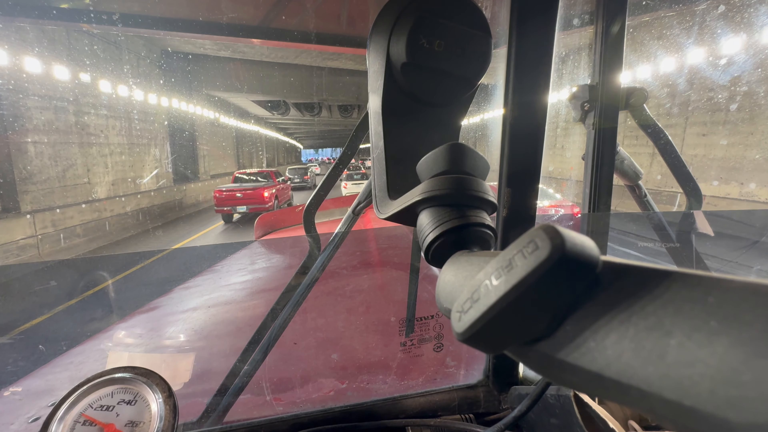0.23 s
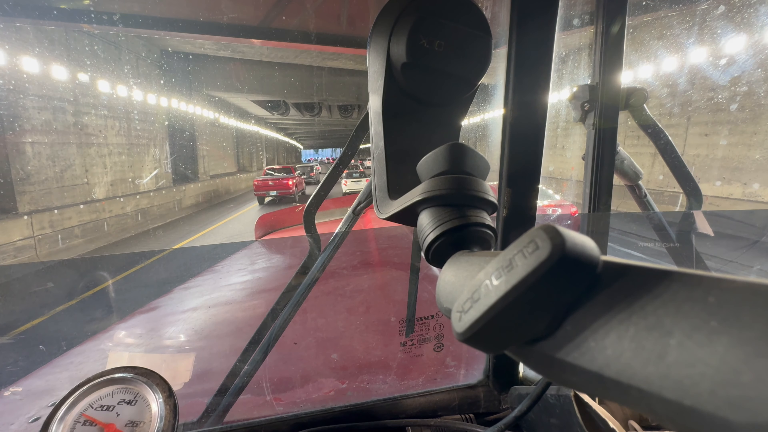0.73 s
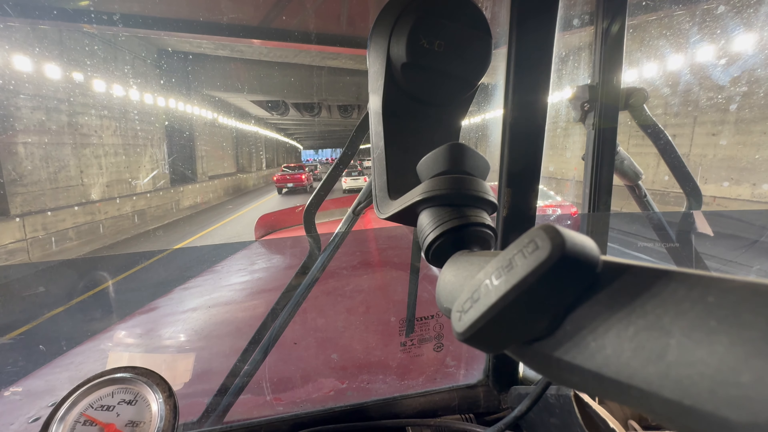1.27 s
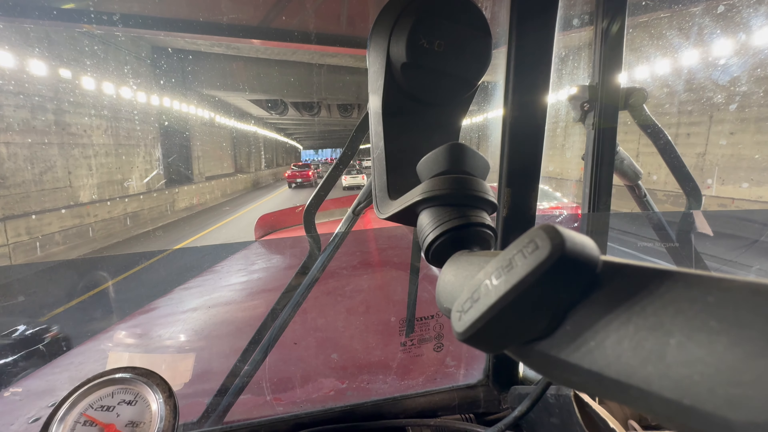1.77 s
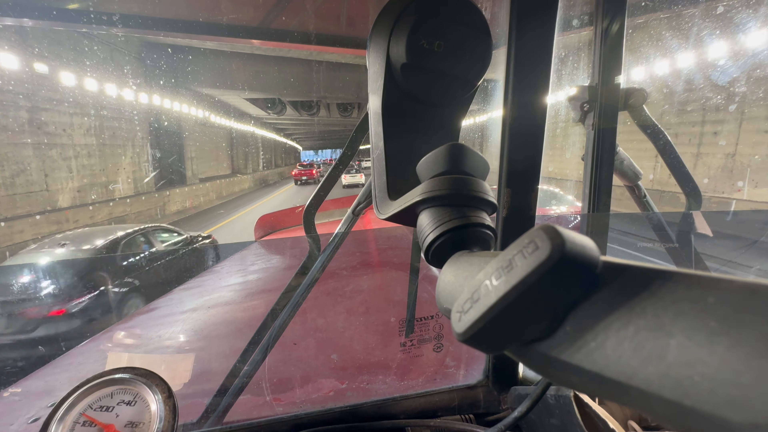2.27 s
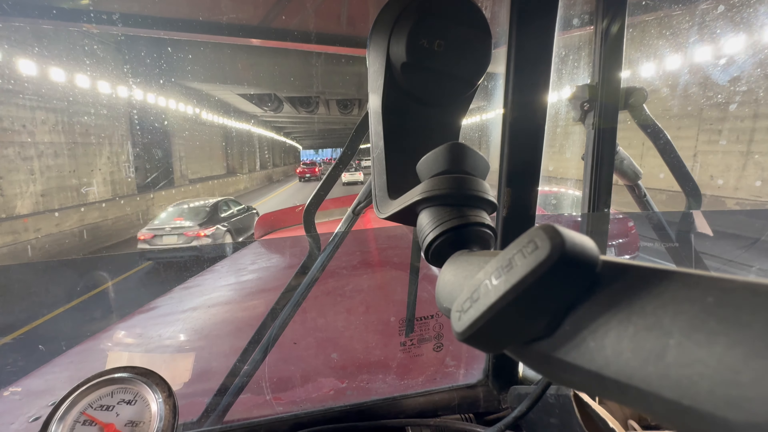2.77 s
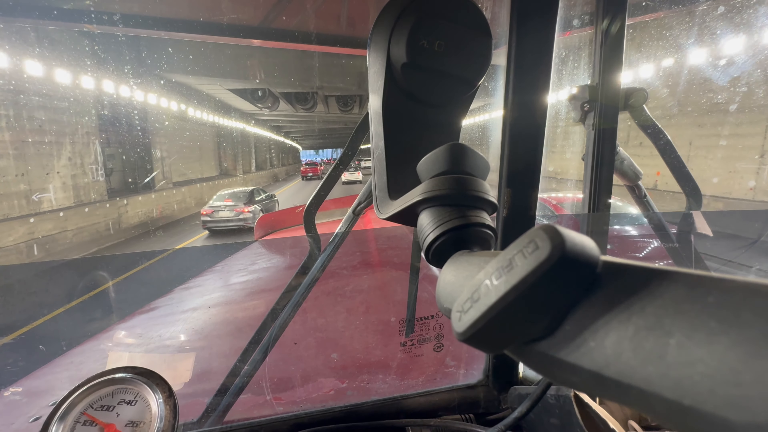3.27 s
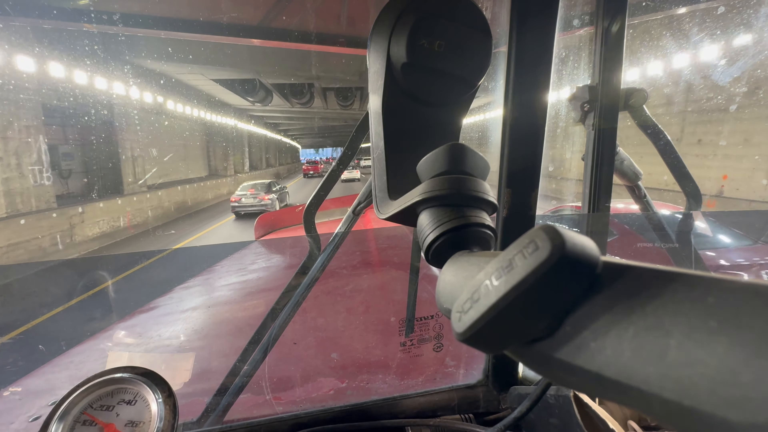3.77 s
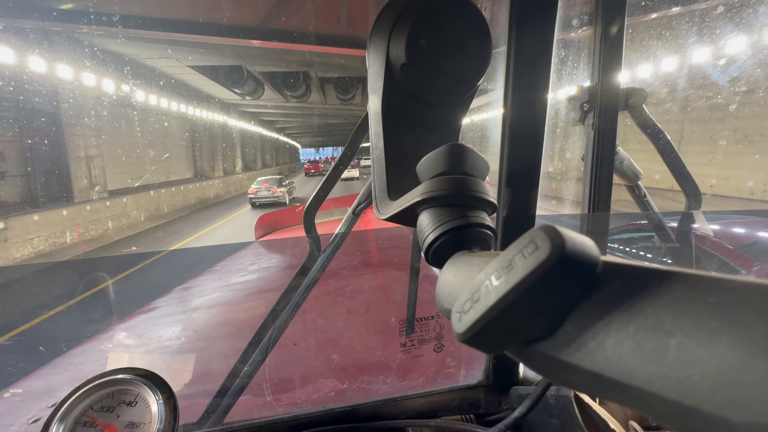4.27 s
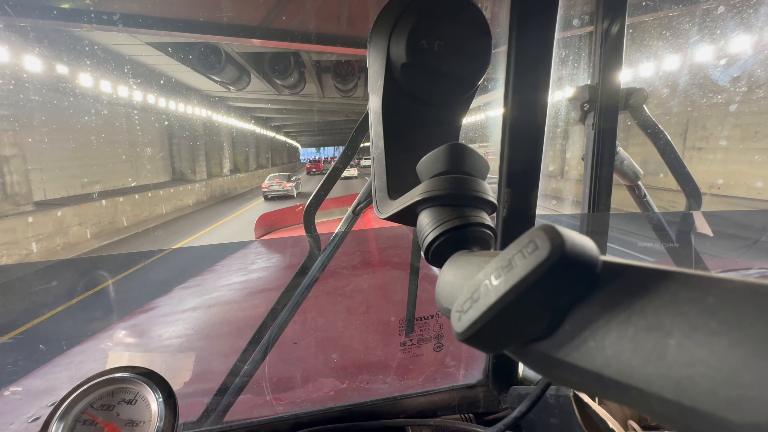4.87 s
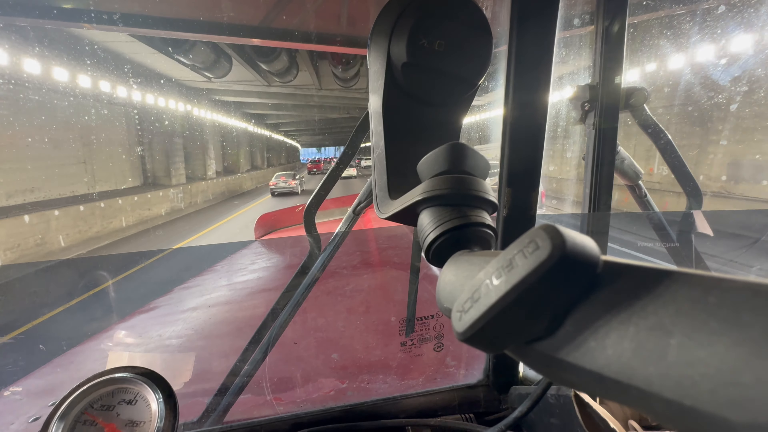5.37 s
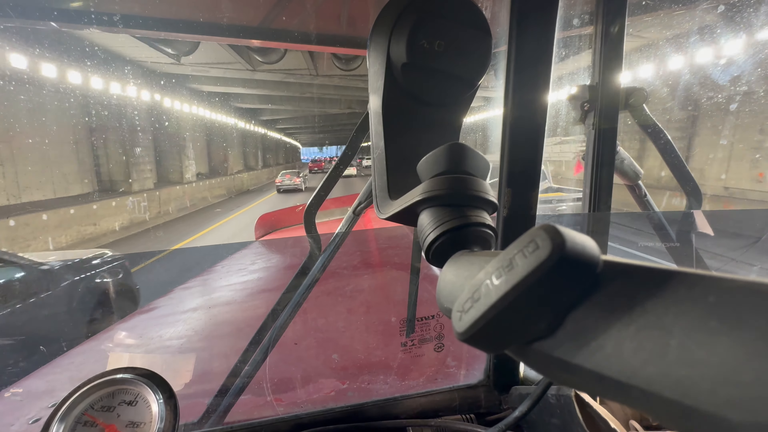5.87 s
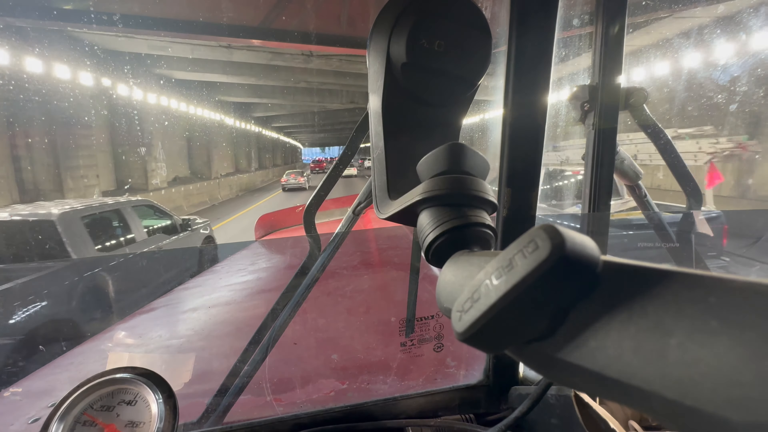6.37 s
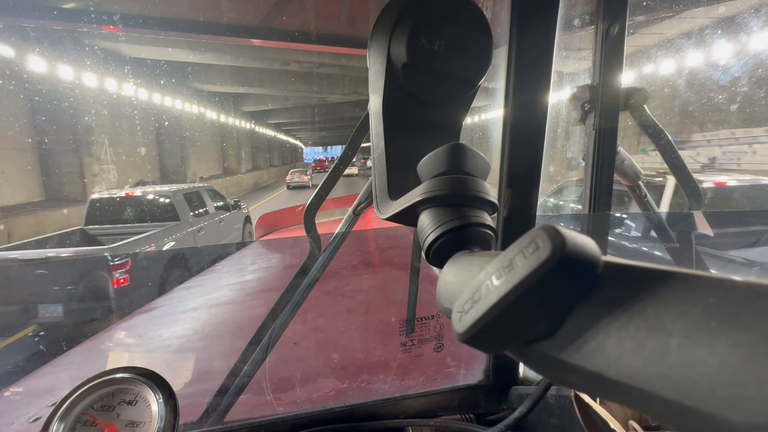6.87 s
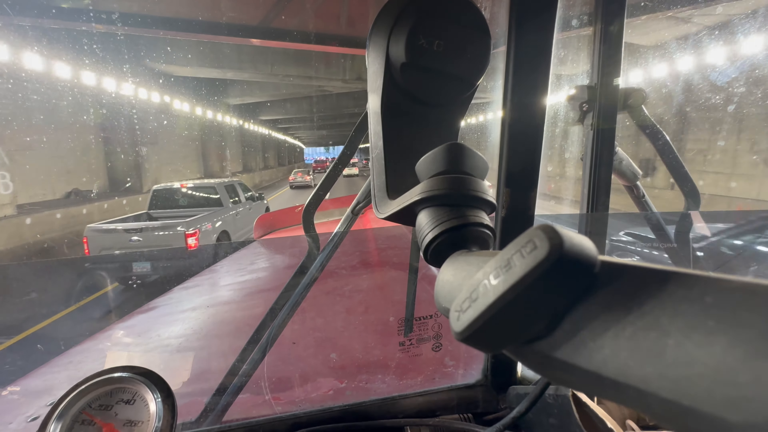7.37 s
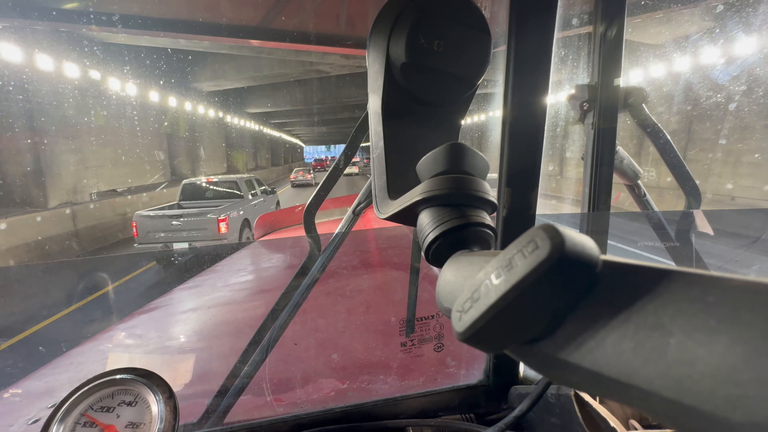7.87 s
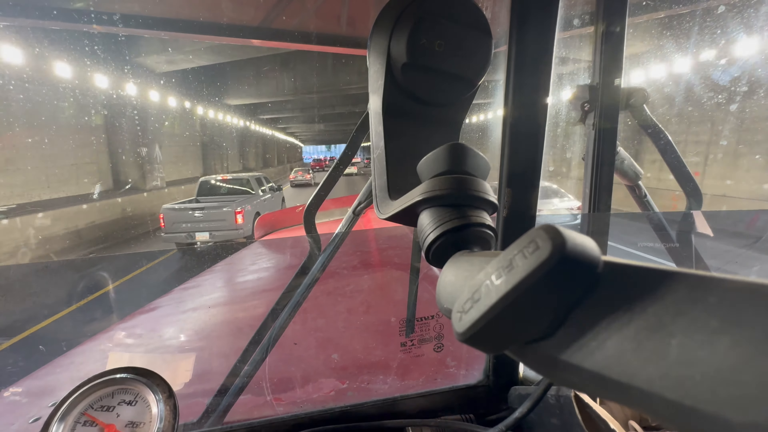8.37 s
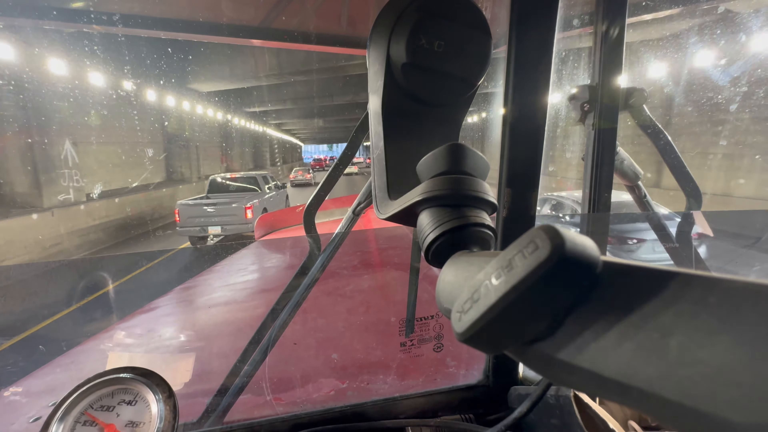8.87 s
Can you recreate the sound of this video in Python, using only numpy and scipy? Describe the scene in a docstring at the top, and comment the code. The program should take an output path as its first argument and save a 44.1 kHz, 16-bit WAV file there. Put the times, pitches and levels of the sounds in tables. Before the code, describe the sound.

A heavy diesel truck accelerates through a tunnel, heard in stereo by the driver. Throaty uneven exhaust pulses and a booming hum fill the cab, with block clatter and a thin turbo whistle on top. The pitch climbs in three long pulls, sagging between them as gears clunk and air valves puff, the strongest a sharp pssh near the end. Low road rumble runs throughout.

```python
"""A six-cylinder diesel truck pulls away in a tunnel and changes up through the gears, heard in stereo
from inside the cab. Uneven exhaust pulses ring cab modes, and sines carry the firing rate and multiples.
Noise pulsing with the firings makes the block clatter; a narrow noise band is the turbo whistle.
At shifts the load drops, air valves puff in noise bursts and the lever ticks in struck modes.
A seal squeaks in short glides; intake hiss and road rumble are banded noise."""
import sys
import numpy as np
from scipy import signal
from scipy.io import wavfile

SR = 44100
rng = np.random.default_rng(int(sys.argv[2]) if len(sys.argv) > 2 else 0)


def inscribe(sig):
    """Save sig as 16-bit PCM at rate SR to the path in sys.argv[1].

    A 1-D sig is mono; a 2-D sig holds one channel per row.
    Samples are clipped to [-1, 1] before scaling.
    """
    pcm = np.round(np.clip(np.atleast_2d(sig).T, -1, 1) * 32767)
    wavfile.write(sys.argv[1], SR, pcm.astype(np.int16))


N = 401751

# Every *_LAW is one row: base level in dB, share of the load, share of the boost,
# dB per octave of engine speed above 60 firings per s, dB per octave of turbo pitch above 5 kHz.

# Exhaust pulses in the cab.
EXHAUST_LAW = (-39.5, 1, 0, 1, 2)
# Lift of the cab modes below 150 Hz.
LOW_MODES_LAW = (4, 0.5647, -0.34, -3, -0.56)
# Relative strength of each cylinder's firing, at low engine speed.
SLOW_CYLINDERS = [1.5, .68, .55, 1.0, .45, .52]
# The same at high engine speed, where one firing leads.
FAST_CYLINDERS = [1.5, .72, .6, .8, .55, .6]
# The same heard crosswise in the cab: every third firing leads.
CROSSWISE_CYLINDERS = [1.5, .5, .6, 1.25, .45, .55]
# Manifold runners differ: mean delay of each cylinder's pulse in ms.
RUNNER_DELAYS = [0, .55, -.4, .3, -.6, .15]
# Lift of groups of cab modes. Each row: time in seconds, bark near 450 Hz alike on both sides in dB,
# bark crosswise in dB, modes from 150 to 370 Hz in dB, modes above 560 Hz in dB, modes below 150 Hz in dB.
MODE_LIFTS = [(0, -14, -9, 14.5, -12, 5), (.4, -20, -9, 5.5, -4, 3.5), (.58, -9, -6, 0.5, 3.5, -2),
              (.9, -19.5, -10, -1, 1, 0), (1.3, 1, -2.5, 1.5, -1.5, -2), (1.7, -1, -5, 4, 3, 2),
              (2.2, -1.5, -3.5, 4.5, 5, -0.5), (2.8, -4, -5, 1.5, 4, -5.5), (3.1, 5, 0.5, 4, 1, -2.5),
              (3.5, -2, -1.5, 5, 3.5, -3), (3.9, 4.5, -1.5, 6, 1, 2.5), (4.25, -9, -3, -0.5, 6, 3),
              (4.6, -9, -2.5, 5.5, -1, 3.5), (5.0, 4.5, -4, 6.5, -1, 1), (5.4, 2.5, 1, 2, 5, -2.5),
              (5.7, -1, -7, 3, -6, -2.5), (6.0, -24, -7, -1.5, 5, -3), (6.35, -6, -2, 4, -1, 3),
              (6.65, 4, 1.5, 7.5, 7, 6), (7.1, -0.5, -0.5, 0, -0.5, -9), (7.4, 0, -5, 1.5, -8, -9.5),
              (7.7, -5, -13, 0.5, -7, -6), (8.0, -31, -6, 3.5, 7, -2), (8.35, -4, 0, -1, -0.5, 5),
              (8.7, 5.5, 0, 2, 1.5, -1), (9.11, -3, 1.5, 4.5, -2, -1)]
# Once per engine cycle the bark swells. Each row: time in seconds, mean depth in dB.
THROB = [(0, .5), (2.7, .5), (3.1, 3), (3.9, 1), (4.7, 1), (5.0, 4.5), (5.5, 3), (5.8, 0), (6.4, 1),
         (6.7, 3.5), (7.05, 0), (8.4, 0), (8.7, 3), (9.11, 2)]


def exhaust(per_s, count, state):
    """One pulse per firing, uneven from cylinder to cylinder, plus some turbulence, rings the cab."""
    level_db, low_db = follow(EXHAUST_LAW, state), follow(LOW_MODES_LAW, state)
    *barks_db, middle_db, upper_db, lowest_db = in_time(MODE_LIFTS)
    at = np.flatnonzero(np.diff(np.floor(count)))[:-1]
    cylinder = count[at].astype(int) % 6
    chance = rng.standard_normal((len(at), 2))
    late_ms = np.array(RUNNER_DELAYS)[cylinder] + .08 * chance[:, 0]
    heard = at + np.round(late_ms * SR / 1000).astype(int)

    whole, across, steady = np.full((3, N), 1e-18)
    fast = np.clip((per_s[at] - 52) / 8, 0, 1)   # crossfade from 52 to 60 firings per s
    strength = (1 - fast) * np.array(SLOW_CYLINDERS)[cylinder] + fast * np.array(FAST_CYLINDERS)[cylinder]
    whole[heard] = strength + .16 * chance[:, 1]
    across[heard] = np.array(CROSSWISE_CYLINDERS)[cylinder] + .09 * chance[:, 1]
    steady[at] = np.mean(SLOW_CYLINDERS)
    # the even part below 340 Hz is taken out: it sounds as the firing tones
    lows = signal.sosfiltfilt(signal.butter(3, 340, fs=SR, output="sos"), steady)
    turbulence = from_db(-18) * np.sqrt(per_s / SR) * rng.standard_normal((2, N))

    throb_depth_db = in_time(THROB)[0] * np.clip(1 + .6 * drift(5), 0, 2)
    throb_db = throb_depth_db * np.cos(2 * np.pi * (count - 1.45) / 6)
    scale = np.sqrt(SR / per_s)   # same power at any speed
    alike = scale * (whole - lows + turbulence[0])
    opposed = scale * (across + turbulence[1])
    barks_db = np.array(barks_db) + 6.5 + throb_db
    return from_db(level_db + 28.0) * cab(alike, opposed, low_db + lowest_db, middle_db, barks_db, upper_db)


# Cab modes heard alike on both sides.
# Each row: frequency in Hz, nominal width in Hz, relative level in dB.
ALIKE_MODES = [(42.2, 21, 0), (84.4, 33.8, 2.5), (128.5, 13.5, 11), (181.6, 79, -24), (213.2, 23.6, 2.5),
               (289.5, 12.5, 1.5), (337, 30, -23), (420.6, 20, -19.5), (448.5, 26, -17.5), (479, 63, -24.5),
               (553, 27, -35), (596, 15, -17.5), (710.3, 43, -14.5), (869, 41, -29.5)]
# Crosswise cab modes, opposite on the two sides.
# Each row: frequency in Hz, nominal width in Hz, relative level in dB.
CROSSWISE_MODES = [(84.6, 16, 0), (164, 21.4, 5.5), (272, 48, -6), (339, 18, -4.5), (405, 33, -3.5),
                   (436, 70, -10.5), (536, 46, -32), (627, 110, -15.5), (670, 46, -19.5), (976, 62, -13),
                   (1070, 110, -21), (1150, 99, -22.5)]
SHARPEST_Q, MODE_FLICKER_DB = 24, 2.5   # modes above 250 Hz are damped by the trim and come and go
UPPER_LEAD_S = .008   # modes above 560 Hz speak ahead of the bark


def cab(alike, opposed, low_db, middle_db, barks_db, upper_db):
    """Cab modes ring in parallel; crosswise ones push the sides against each other."""
    sides = []
    for x, modes, bark_db in zip((alike, opposed), (ALIKE_MODES, CROSSWISE_MODES), barks_db):
        lift = from_db([low_db, middle_db, bark_db, upper_db])   # below 150 Hz, up to 370, up to 560, above
        groups = np.zeros((4, N))
        for hz, width, level_db in modes:
            # the lows of a pulse arrive first
            delay_s = .004 * np.log2(hz / 600) - UPPER_LEAD_S * (hz > 560)
            late = np.roll(x, round(SR * delay_s))
            if hz > 250:
                width = max(width, hz / SHARPEST_Q)
                level_db = level_db + MODE_FLICKER_DB * drift(4.0)
            # filtered twice: dark valleys between the modes, no click
            ringing = resonance(resonance(late, hz, width), hz, 4 * width)
            groups[np.searchsorted([150, 370, 560], hz)] += from_db(level_db) * ringing
        sides.append(np.sum(lift * groups, axis=0))
    return sides[0] + sides[1] * [[1], [-1]]


# Tone at the firing rate. Each row: time in seconds, level in dB.
FIRING_TONE = [(0, -26), (.4, -29.5), (.62, -25.5), (.8, -29.5), (1.0, -20.5), (1.55, -19.5), (2.2, -19),
               (2.62, -18.5), (2.85, -15), (3.2, -20), (3.81, -18.5), (4.14, -24.5), (4.45, -28.5),
               (4.75, -21), (5.7, -16), (5.77, -32), (5.9, -24), (5.98, -36.5), (6.2, -39), (6.3, -23.5),
               (6.44, -20.5), (7.2, -17.5), (7.7, -17), (7.78, -30), (7.97, -30), (8.1, -45), (8.26, -25.5),
               (8.42, -19), (8.7, -21), (9.11, -16.5)]
# Tone an octave above the firing rate, a level law.
OCTAVE_LAW = (-38.5, 1.97, -0.27, -1.1, 0.6)
# How the cab passes that octave. Each row: frequency in Hz, gain in dB.
OCTAVE_PASS = [(80, 6), (90, -5), (100, -4), (110, -7.5), (120, -5.5), (134, 9.5), (146, 1.5), (160, -3),
               (175, -13.5), (200, -4)]
WAVER_DB, WAVER_PER_S = 2, 1.4   # the octave swells and sinks
# Third, fourth and sixth multiples of the firing rate, a level law.
OVERTONES_LAW = (-48, 1.32, 0, 3.5, 1)
# How the cab passes these multiples. Each row: frequency in Hz, gain in dB.
OVERTONE_PASS = [(130, -8), (185, -6), (205, 2), (218, 5), (235, 2), (258, -9), (286, 4), (303, -8),
                 (325, -8), (350, -16), (400, -9), (425, -6), (455, -12), (520, -16)]


def firing_tones(per_s, count, state):
    """The firing rate and its low multiples stand clean, lifted where they cross a cab mode."""
    tone_db, = in_time(FIRING_TONE)
    cab_gain_db = at_hz(OCTAVE_PASS, 2 * per_s)
    octave_db = follow(OCTAVE_LAW, state) + cab_gain_db + WAVER_DB * drift(WAVER_PER_S)
    upper = 0
    for k in (3, 4, 6):
        gain_db = at_hz(OVERTONE_PASS, k * per_s) + 4 * drift(9.0)
        upper = upper + from_db(gain_db) * np.cos(2 * np.pi * k * count)
    tones = from_db(tone_db) * np.sin(2 * np.pi * count) - from_db(octave_db) * np.sin(4 * np.pi * count)
    return np.sqrt(2) * (tones + from_db(follow(OVERTONES_LAW, state)) * upper * panned(3.0))


# Combustion noise, a level law.
KNOCK_LAW = (-47, 0.0981, 0.6919, -1.5, 3.5)
# Spectrum of the combustion noise. Each row: frequency in Hz, relative density in dB per Hz.
CLATTER_SPECTRUM = [(590, -50), (1000, 3.5), (1110, 15.5), (1470, -2), (1600, -3), (1780, 4.5), (6000, -35),
                    (7800, -81)]
# Ringing of the engine block.
# Each row: frequency in Hz, width in Hz (at least 50 is used), relative level in dB.
BLOCK_MODES = [(887, 90, -6), (1140, 27, -4), (1260, 46, -8), (1577, 63, -8), (1920, 71, -20),
               (2617, 35, -10), (3820, 50, -0.5)]


def clatter(count, state, knock=.3, flicker_db=3.2):
    """Combustion noise swells with each firing and rings the block."""
    beat = 1 + knock * np.cos(2 * np.pi * count) + 0.051 * np.cos(2 * np.pi * (count - 1.2) / 6)
    noise = beat * banded_noise(CLATTER_SPECTRUM, patchy_db=1.0)
    rings = 0
    for hz, width, db in BLOCK_MODES:
        gain = from_db(db + 11.0 + flicker_db * drift(4.5))
        rings = rings + gain * resonance(noise, hz, max(width, 50))
    return from_db(follow(KNOCK_LAW, state) - 2.0) * (noise + rings)


# Turbo whistle. Each row: time in seconds, pitch in Hz, level in dB.
TURBO = [(0, 2200, -80), (1, 2400, -66), (2, 2950, -64), (2.6, 3200, -63), (3, 3600, -61), (3.9, 5400, -61),
         (4.2, 5000, -64), (4.6, 4720, -65), (5, 5200, -64), (5.4, 6150, -62), (5.7, 6640, -64),
         (6.1, 6050, -68), (6.35, 5680, -66), (7.1, 6860, -65), (7.4, 7800, -64), (7.65, 8800, -66),
         (8.0, 7800, -65), (8.3, 7100, -70), (9.11, 8300, -67)]


def turbo(width_hz):
    """Two slow noises on sine and cosine make a narrow band of noise ride on the blade pitch."""
    hz, level_db = in_time(TURBO)
    turn = 2 * np.pi * np.cumsum(hz) / SR
    whistle = drift(width_hz) * np.sin(turn) + drift(width_hz) * np.cos(turn)
    return from_db(level_db + 1.2 * drift(6)) * whistle * panned(8.2)


# Throttle pressed. Each row: start in seconds, end in seconds, load at start in dB, load at end in dB,
# fall time after lifting in seconds.
PULLS = [(0.46, 0.65, 7.5, 6.5, 0.086), (0.862, 2.32, 7, 6.5, 0.17), (2.291, 3.026, 9.5, 14, 0.59),
         (3.002, 3.9, 12, 6.5, 0.24), (4.472, 5.703, 3.5, 11, 0.11), (6.29, 7.687, 2.5, 12.5, 0.19),
         (8.286, 9.306, 6, 8, .1)]
# Load with the throttle shut. Each row: time in seconds, load in dB.
COASTING = [(.2, -5.5), (.78, 0), (4.4, -0.7), (6.1, 0.3), (8.15, -3)]
PRESS_S, BOOST_LAG_S = 0.083, 0.61   # rise of the load; boost pressure trails it


def engine_load():
    """Load in dB from the throttle, and the boost that trails it through a one-pole lag."""
    t, (shut,) = np.arange(N) / SR, in_time(COASTING)
    load = shut
    for start, end, start_db, end_db, fall in PULLS:
        pressed = np.clip((t - start) / PRESS_S, 0, 1) * np.clip(1 - (t - end) / fall, 0, 1)
        pull_db = np.interp(t, [start, end], [start_db, end_db])
        load = np.maximum(load, shut + pressed * (pull_db - shut))
    r = np.exp(-1 / (BOOST_LAG_S * SR))
    return load, signal.lfilter([1 - r], [1, -r], load)


# Gear lever ticks. Each row: time in seconds, relative strength in dB, left over right in dB.
TICKS = [(0.015, -23, 9), (0.9188, -63, 7), (4.0237, -6, -10), (4.0594, -31, -27), (4.359, -19, 14),
         (4.4265, -15, 1), (4.4404, -29, 13), (4.4465, -23, 32)]
# Modes of the lever. Each row: frequency in Hz, relative level in dB, time to fall 60 dB in seconds.
LEVER_MODES = [(6150, -10, 0.0095), (7360, 6.5, 0.0014), (8600, -18, 0.0088), (14500, -13, .02)]
# Gears meshing. Each row: time in seconds, relative strength in dB.
CLUNKS = [(0.467, -28), (0.514, -26.5), (0.542, -26), (4.231, -15), (4.244, -17), (4.249, -15),
          (4.271, -29), (4.3, -36), (4.349, -38), (4.455, -27), (4.469, -19), (4.485, -19), (8.201, -20),
          (8.225, -17)]
# Modes of the gearbox. Each row: frequency in Hz, relative level in dB, time to fall 60 dB in seconds.
GEARBOX_MODES = [(1050, 6, .02), (1300, 4, .015), (1550, 9, .018), (1750, 6, .015), (2300, 7, .014),
                 (2900, -3, .01), (3700, -4, .01), (4700, -5, .008)]


def gear_lever():
    """Light ticks of the lever and clunks of the gears, both struck modes."""
    clunks = [(s, db, 3.0) for s, db in CLUNKS]
    return struck(TICKS, LEVER_MODES) + struck(clunks, GEARBOX_MODES)


def struck(blows, modes):
    """Every blow (s, dB, left over right dB) rings the same modes, each with a strength of its own."""
    s, strength_db, pan_db = np.transpose(blows)
    uneven_db = 3 * rng.standard_normal((len(blows), len(modes)))
    sides_db = np.outer([.5, -.5], pan_db)
    out = 0
    for (hz, level_db, t60), own_db in zip(modes, uneven_db.T):
        clicks = np.full((2, N), 1e-18)
        clicks[:, np.round(s * SR).astype(int)] = from_db(strength_db - 26.5 + level_db + own_db + sides_db)
        r, w = from_db(-60 / (t60 * SR)), 2 * np.pi * hz / SR
        out = out + signal.lfilter([0, np.sin(w)], [1, -2 * r * np.cos(w), r * r], clicks)
    return out


# Air valve puffs. Each row: start in seconds, level in dB, length before the decay in seconds,
# left over right in dB.
PUFFS = [(0.358, -56.5, 0.016, 7), (0.46, -49.5, 0.018, 4), (0.509, -48, 0.012, 6), (0.53, -55.5, 0.056, 5),
         (0.673, -53, 0.0079, -6), (2.732, -51.5, 0.03, 3), (4.232, -40.5, 0.019, -2),
         (6.145, -54, 0.021, 10), (7.635, -29, 0.023, -1.5), (7.69, -54.5, 0.29, 12),
         (8.122, -53, 0.044, 9), (8.197, -50.5, 0.053, 9)]
# Spectrum of the puffs. Each row: frequency in Hz, relative density in dB per Hz.
AIR_SPECTRUM = [(1180, -55), (2000, -8), (2590, -0.5), (3870, -2.5), (5740, -0.5), (11900, -8),
                (12900, -22), (13900, -12), (15500, -16)]


def air_valves():
    """Escaping air is noise: each puff opens within 5 ms, holds and dies away."""
    t, gain = np.arange(N) / SR, np.zeros((2, N))
    for s, level_db, length, pan_db in PUFFS:
        a = round(s * SR)
        since = t[:min(N - a, round(10 * length * SR))]
        decay = np.exp(-np.clip(since - length, 0, None) / (0.85 * length))
        shape = np.clip(since / 0.005, 0, 1) * decay
        gain[:, a:a + len(since)] += from_db(level_db) * shape * panned(pan_db)
    return gain * banded_noise(AIR_SPECTRUM, patchy_db=2.5)


# A seal squeaks. Each row: start in seconds, end in seconds, first pitch in Hz, last pitch in Hz,
# relative level in dB.
SQUEAKS = [(8.125, 8.17, 5900, 6200, -50), (8.145, 8.16, 1970, 2000, -51), (8.24, 8.34, 1900, 2080, -43.5)]


def squeaks():
    """A short rough glide with two overtones."""
    out, rough = np.zeros(N), .15 + drift(170)
    for start, end, from_hz, to_hz, level_db in SQUEAKS:
        a, b = round(start * SR), round(end * SR)
        turn = 2 * np.pi * np.cumsum(np.linspace(from_hz, to_hz, b - a)) / SR
        stack = np.sin(turn) + 0.4 * np.sin(2 * turn) + 0.06 * np.sin(3 * turn)
        out[a:b] = from_db(level_db) * np.hanning(b - a) ** .5 * stack
    return out * rough * panned(4)


# Intake hiss, a level law.
INTAKE_LAW = (-54, 0.1749, 0.5778, 0, 4)
# Extra intake hiss above 6.5 kHz, a level law relative to the hiss.
TREBLE_LAW = (-14, 1.15, -0.06, 0, 1.5)
# Spectrum of the hiss. Each row: frequency in Hz, relative density in dB per Hz.
HISS_SPECTRUM = [(1760, -24), (3000, 1.5), (6340, -9), (9710, -23.5), (11200, -17), (12600, -30),
                 (14100, -21), (15500, -37)]


def intake(state):
    """Air hiss that brightens as the turbo spins up."""
    hiss = banded_noise(HISS_SPECTRUM, patchy_db=1.0)
    top = signal.sosfilt(signal.butter(2, 6500, "high", fs=SR, output="sos"), hiss)
    return from_db(follow(INTAKE_LAW, state)) * (hiss + from_db(follow(TREBLE_LAW, state)) * top)


# Road rumble, a level law.
ROAD_LAW = (-30.5, .22, .2, .4, 1.5)
# Spectrum of the rumble. Each row: frequency in Hz, relative density in dB per Hz.
RUMBLE_SPECTRUM = [(15, -58), (25, -17), (86, -1.5), (109, -14), (147, -5), (248, -18.5), (290, -15.5),
                   (335, -35.5), (420, -11), (1100, -30)]


def road(state):
    """Low patchy noise under the cab follows load, boost, engine speed and turbo pitch."""
    return from_db(follow(ROAD_LAW, state)) * banded_noise(RUMBLE_SPECTRUM, patchy_db=3.5)


# Likeness of the two sides in noise. Each row: frequency in Hz, likeness from -1 (opposite) to 1 (same).
LIKENESS = [(60, 1), (130, 1), (290, -0.12), (640, -0.67), (1410, -0.28), (3100, 0.23), (6820, -0.22),
            (15000, 0.57)]
# Side the noise leans to. Each row: frequency in Hz, left over right in dB.
LEANING = [(60, -2.5), (150, -1), (380, 3), (950, -1), (2380, 2), (5980, 8.5), (15000, -8)]


def banded_noise(spectrum, patchy_db):
    """Half-octave bands of stereo noise, each with its own level, flicker, likeness and side; rms 1."""
    out, white = 0, rng.standard_normal((2, 2, N))
    octaves = np.log2(spectrum[-1][0] / spectrum[0][0])
    edges = spectrum[0][0] * 2 ** np.arange(0, octaves + .5, .5)
    for k, (low, high) in enumerate(zip(edges, np.minimum(edges[1:], .45 * SR))):
        band = signal.butter(2, [low, high], "band", fs=SR, output="sos")
        mid, side = signal.sosfilt(band, white[k % 2])   # neighbouring bands use different noise
        hz = np.sqrt(low * high)
        alike = np.clip(at_hz(LIKENESS, hz), -1, 1)
        gain = from_db(at_hz(spectrum, hz) + patchy_db * drift(15.5)) * panned(at_hz(LEANING, hz))
        out = out + gain * (np.sqrt(1 + alike) * mid + np.sqrt(1 - alike) * side * [[1], [-1]])
    return rms_one(out)


def resonance(x, hz, width_hz):
    """A two-pole mode with gain 1 at its peak."""
    r = np.exp(-np.pi * width_hz / SR)
    poles = [1, -2 * r * np.cos(2 * np.pi * hz / SR), r * r]
    return signal.lfilter([(1 - r * r) / 2, 0, (r * r - 1) / 2], poles, x)


def drift(rate):
    """Slow chance of spread 1: noise at a fortieth of SR through two equal poles at rate Hz."""
    r = np.exp(-80 * np.pi * rate / SR)
    slow = signal.lfilter([1], [1, -2 * r, r * r], rng.standard_normal(N // 40 + 2002))[2000:]
    return np.interp(np.arange(N) / 40, np.arange(len(slow)), rms_one(slow))


def follow(law, state):
    """Level in dB of a layer from load, boost, engine speed and turbo pitch."""
    return law[0] + np.dot(law[1:], state)


def in_time(rows):
    """Columns of a table drawn as straight lines over time."""
    s, *columns = np.transpose(rows)
    return [np.interp(np.arange(N) / SR, s, c) for c in columns]


def at_hz(points, hz):
    """Value of a table at a frequency, straight lines over log frequency."""
    return np.interp(np.log(hz), np.log(np.array(points)[:, 0]), np.array(points)[:, 1])


def panned(db):
    """Gains of the two sides, left over right in dB."""
    return from_db(np.array([[db / 2], [-db / 2]]))


def from_db(db):
    """Amplitude from dB."""
    return 10 ** (np.asarray(db) / 20)


def rms_one(x):
    """Scale to rms 1."""
    return x / np.sqrt(np.mean(x ** 2) + 1e-20)


# Engine speed: climbs in the gears, sags during shifts. Each row: time in seconds, firings per second.
SPEED = [(0, 42.5), (.5, 40.3), (.66, 42.9), (.95, 43.3), (1.22, 50.4), (2.15, 50.8), (2.53, 45),
         (2.68, 45.4), (2.98, 60.3), (3.31, 65.7), (3.64, 77.8), (3.81, 80.2), (4.4, 81.5), (4.62, 67.6),
         (4.8, 67.7), (5.7, 85.6), (6.17, 82.5), (6.36, 67.2), (7, 75.8), (7.65, 86), (7.84, 80.5),
         (8.0, 80), (8.1, 66.8), (8.3, 66), (8.42, 65.3), (9.11, 74)]


def scene():
    """Engine, shifting noises and background share one engine speed, load, boost and turbo pitch."""
    per_s, = in_time(SPEED)
    count = np.cumsum(per_s) / SR + 5.6   # firings, from a point within the cycle
    turbo_hz = in_time(TURBO)[0]
    state = np.array([*engine_load(), np.log2(per_s / 60), np.log2(turbo_hz / 5000)])
    engine = exhaust(per_s, count, state) + firing_tones(per_s, count, state)
    engine = engine + clatter(count, state) + turbo(width_hz=180)
    shifting = gear_lever() + air_valves()
    return engine + shifting + squeaks() + intake(state) + road(state)


def record(dry):
    """Peaks are rounded by a tanh, the top is cut at 15.8 kHz."""
    top_cut = signal.cheby2(24, 50, 15800, fs=SR, output="sos")
    return signal.sosfilt(top_cut, 1.137 * np.tanh(dry / 0.79))


dry = scene()
out = record(dry)
inscribe(out)
```